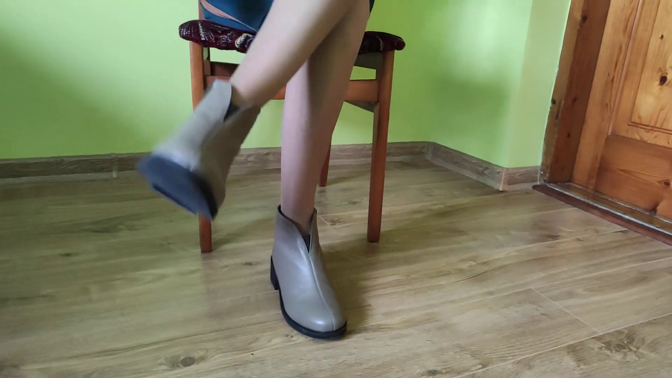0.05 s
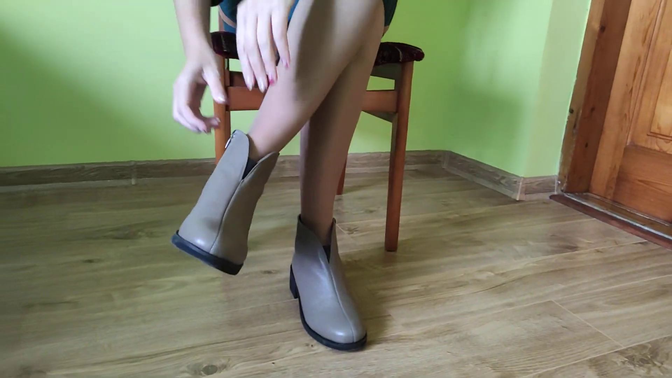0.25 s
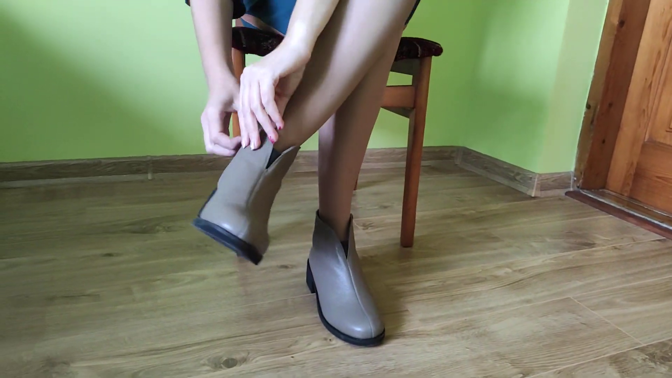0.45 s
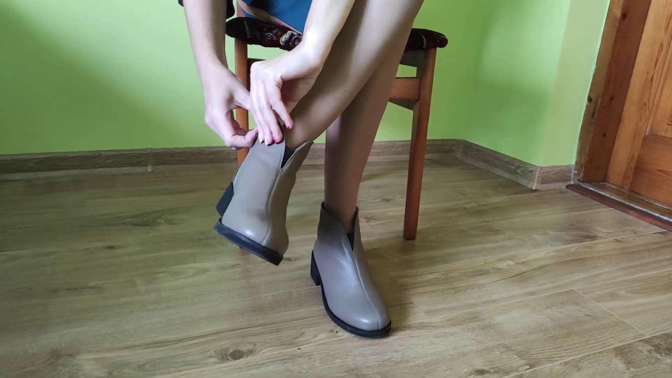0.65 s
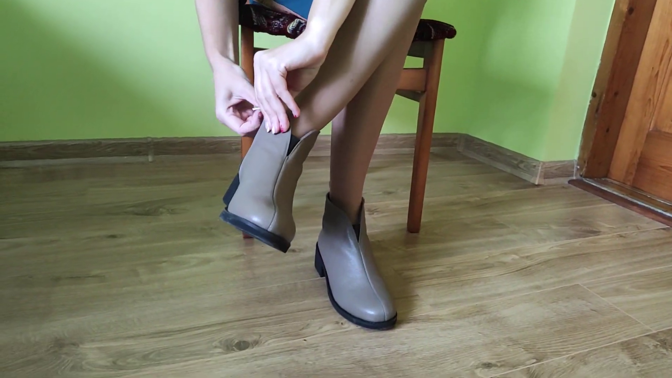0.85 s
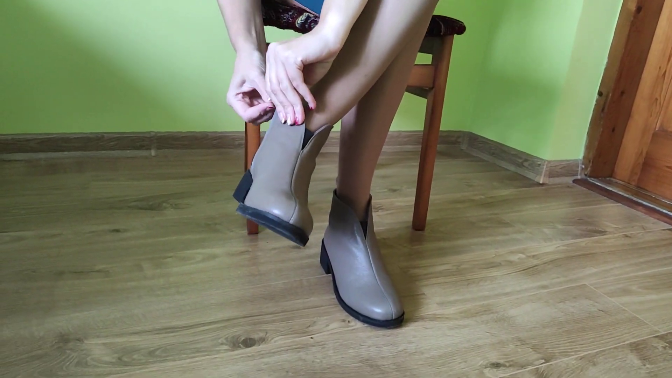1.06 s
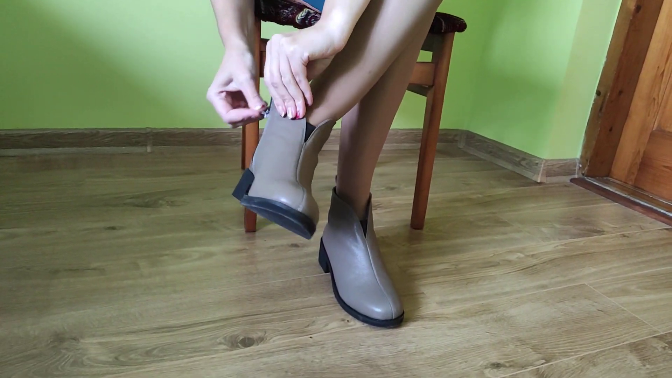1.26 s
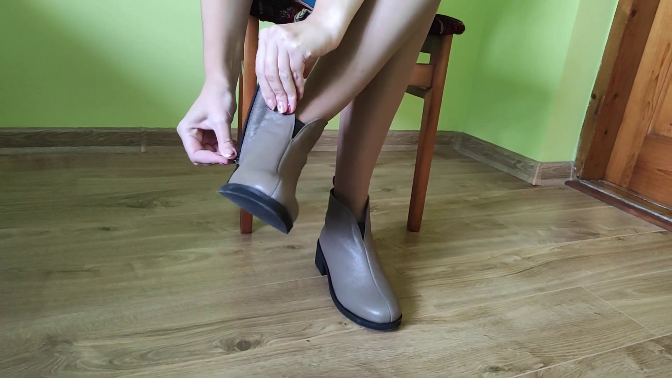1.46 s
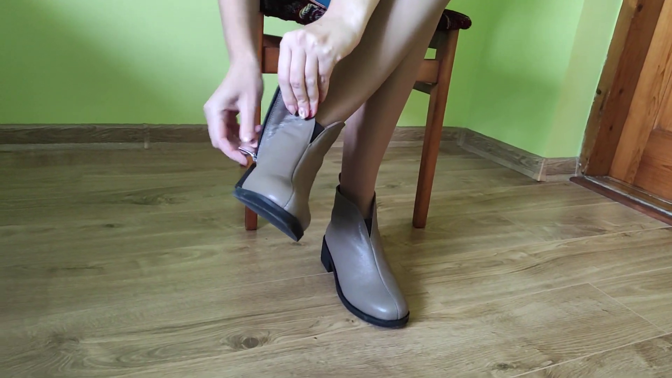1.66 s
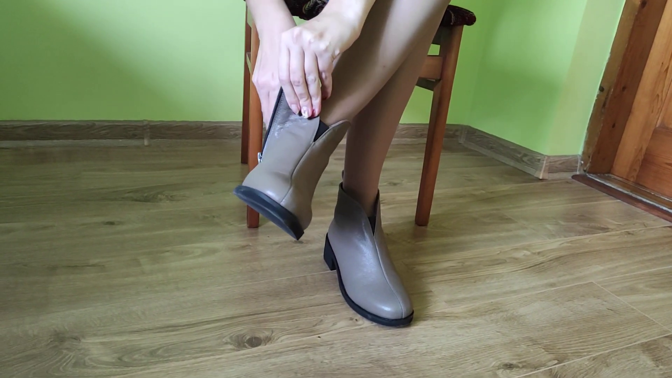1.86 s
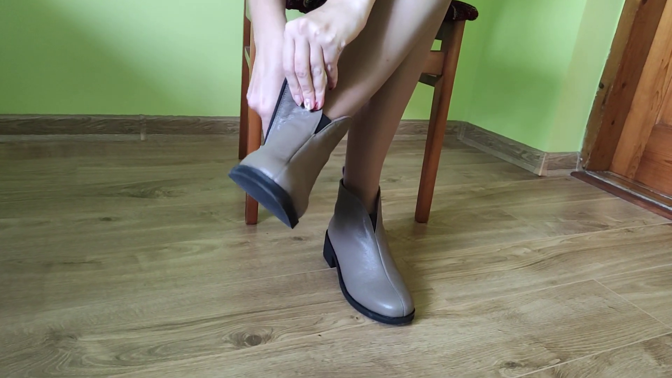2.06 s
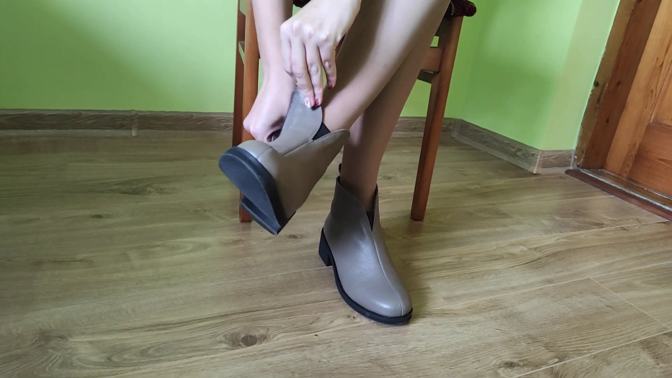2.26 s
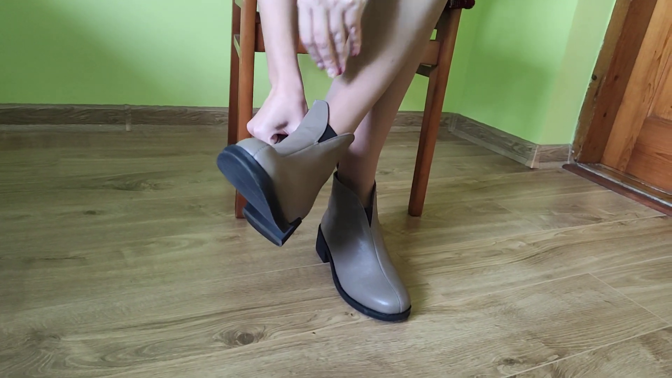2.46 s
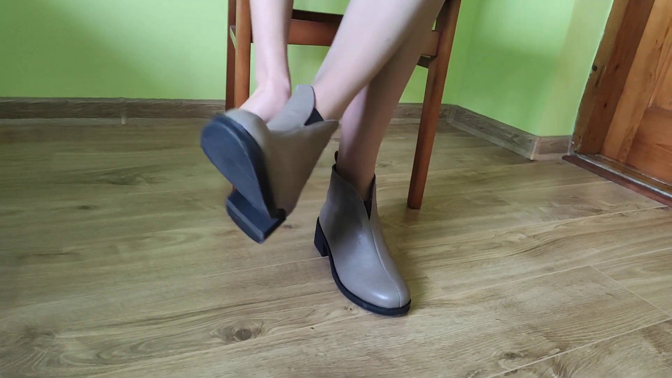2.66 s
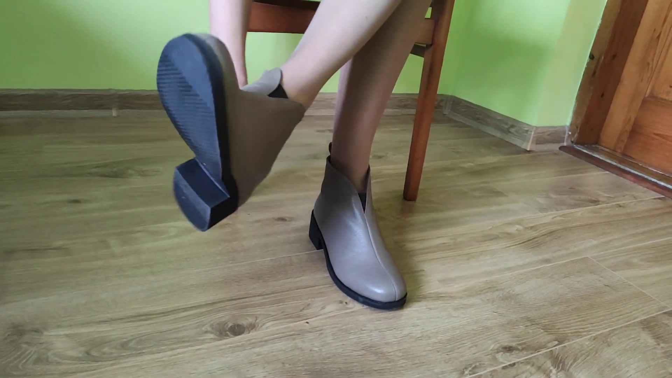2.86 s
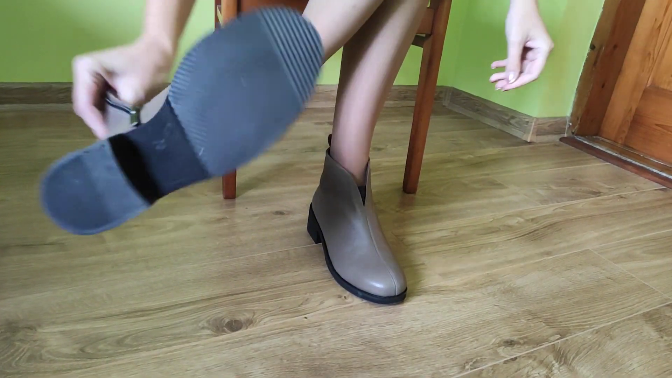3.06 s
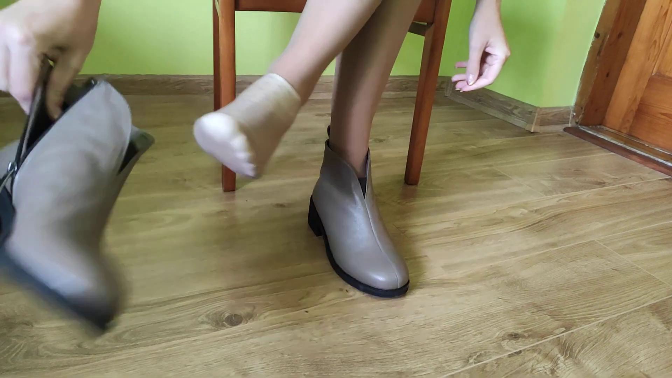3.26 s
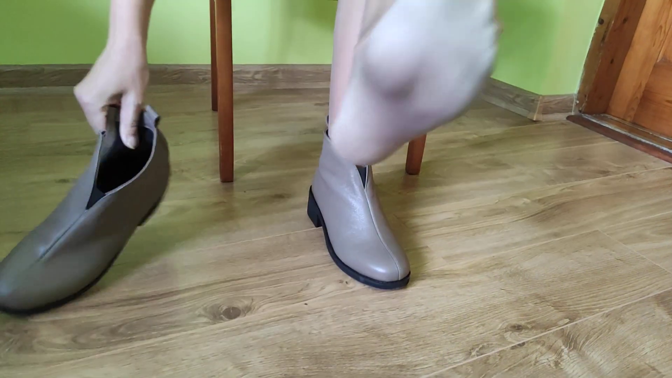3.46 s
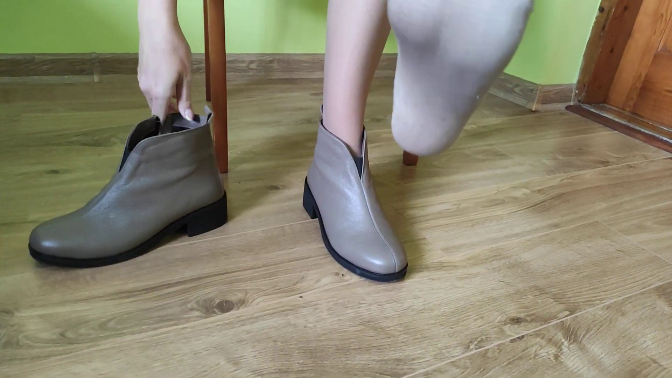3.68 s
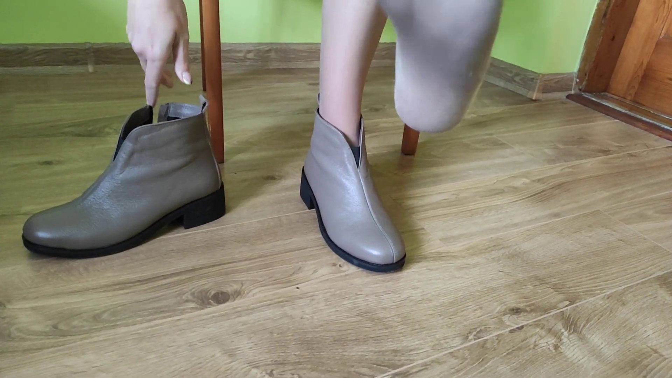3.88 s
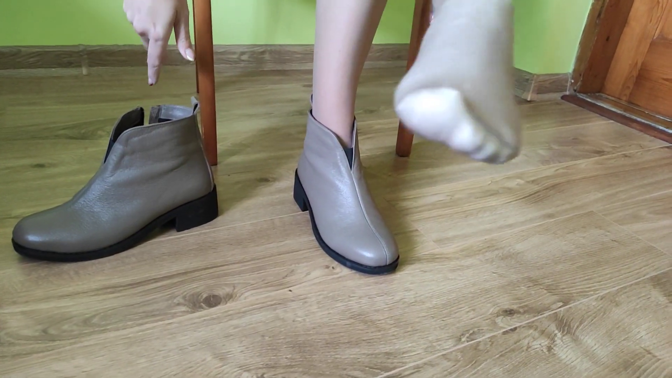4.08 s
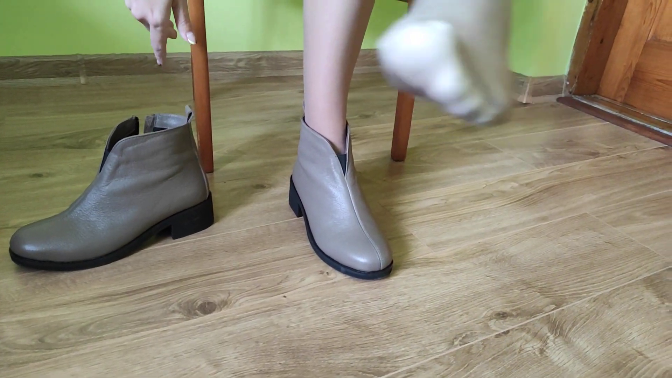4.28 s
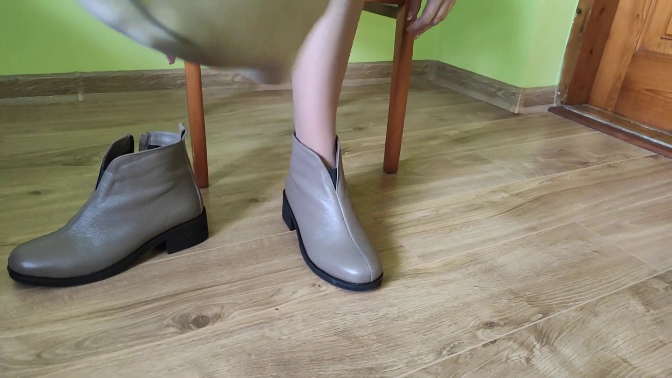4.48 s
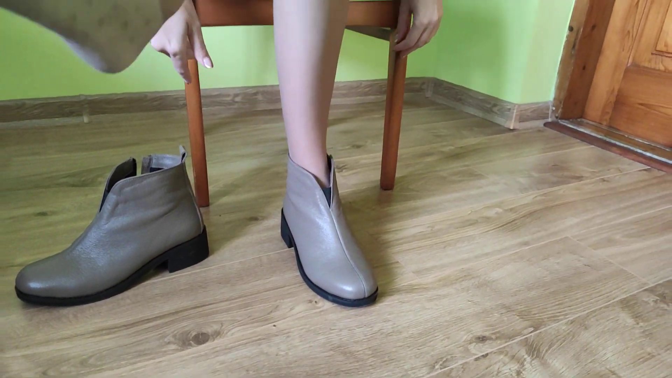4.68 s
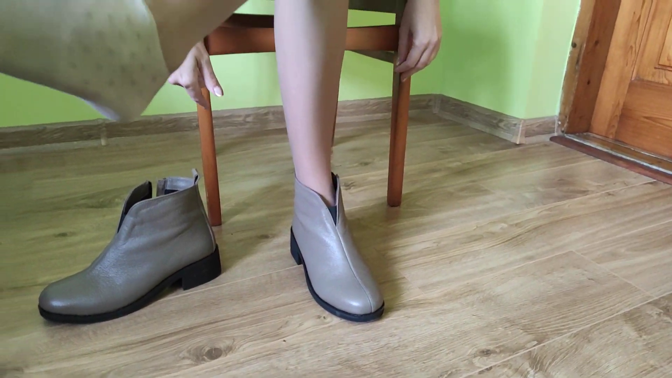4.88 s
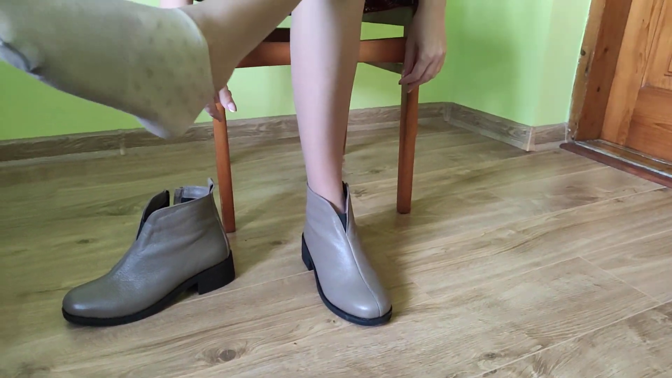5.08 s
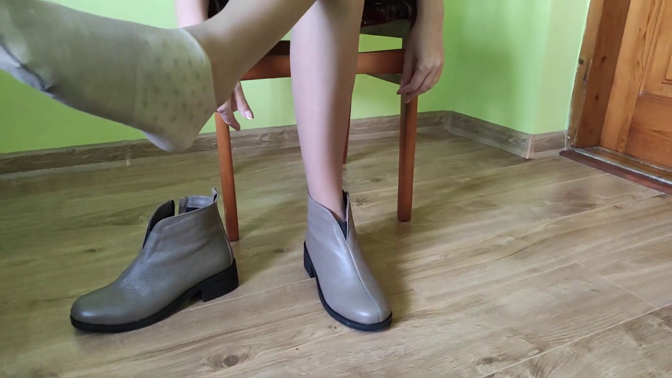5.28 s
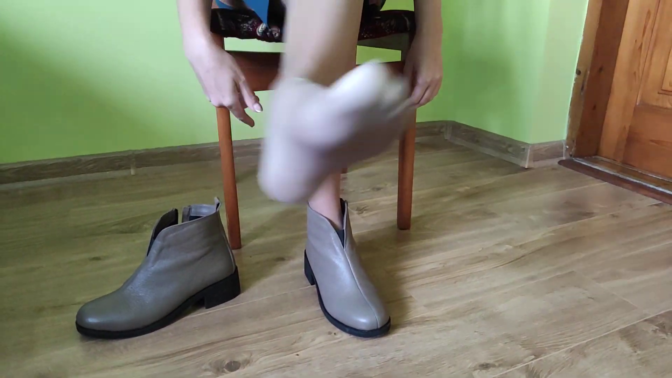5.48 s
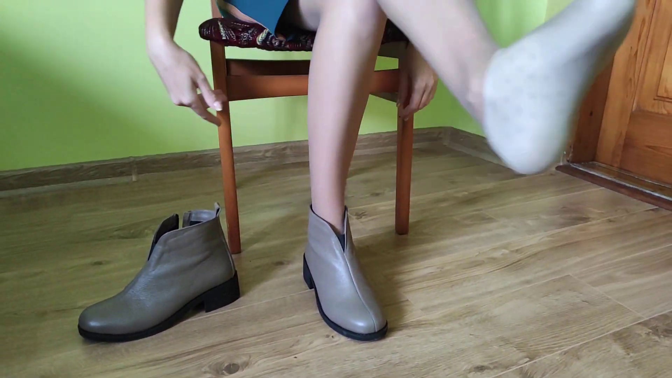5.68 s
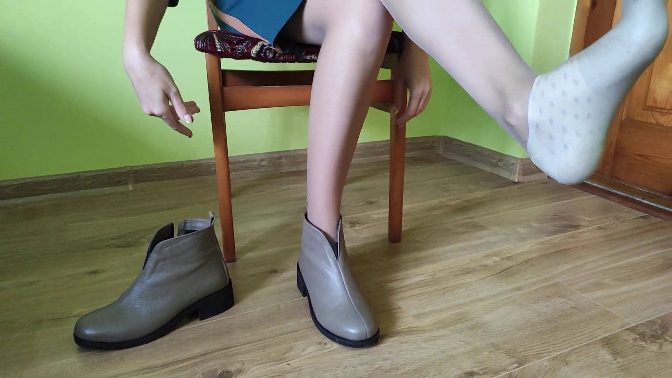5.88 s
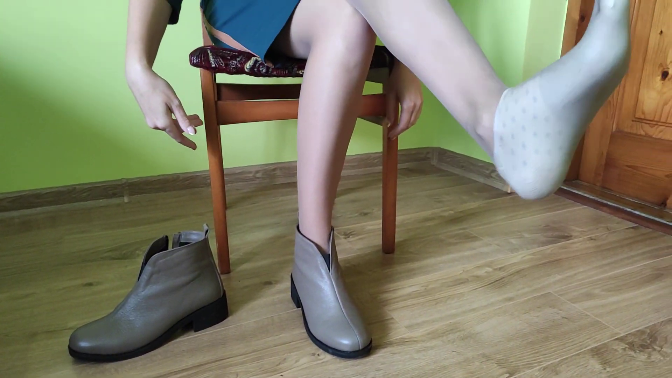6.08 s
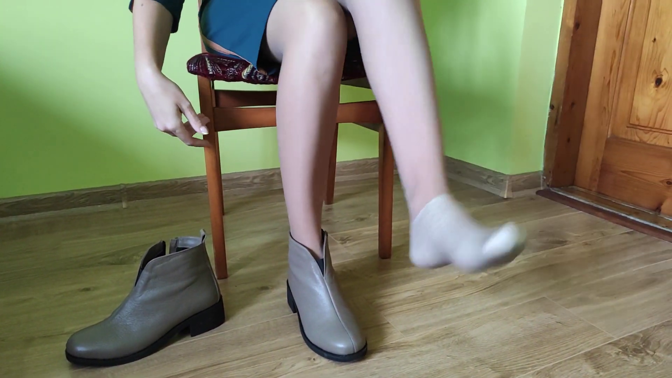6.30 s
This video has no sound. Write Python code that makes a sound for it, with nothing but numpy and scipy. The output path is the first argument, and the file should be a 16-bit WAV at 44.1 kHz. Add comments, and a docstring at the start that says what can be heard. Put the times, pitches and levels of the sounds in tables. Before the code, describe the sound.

Light leather scuffs and fumbling clicks come first, then a bright snap and quick zip rasp. A breathy fabric swish grows and peaks as the boot comes off, and a loud woody knock with a hollow boot thud follows, repeated at once more softly, with faint settling taps. Faint brushing and a few dry ticks end it. Close stereo microphones, small hard room with a short echo, low and hissy air, impacts leaning left.

```python
"""Cloth and leather rub and tick; a leather ankle boot is unzipped, pulled off a socked foot and set on laminate.
Rubbing is slip noise through material colours, the zip a run of scrapes, ticks are decaying noise bursts.
Sole knocks ring board modes, with an edge crack and a hollow-boot thump.
Sparse echoes make the bare room, over quiet air; two small microphone ports favour 7 kHz."""
import sys
import numpy as np
from scipy import signal
from scipy.fft import rfft, irfft
from scipy.io import wavfile
from scipy.ndimage import uniform_filter1d

SR = 44100
rng = np.random.default_rng(int(sys.argv[2]) if len(sys.argv) > 2 else 0)


def to_wav(s):
    """Save 16-bit WAV."""
    ch = np.atleast_2d(s).T  # columns
    pcm = np.round(np.clip(ch, -1, 1) * 32767)  # PCM
    wavfile.write(sys.argv[1], SR, pcm.astype(np.int16))


def boost(x):
    """Linear amplitude factor 10**(x/20) for a level x in decibels (scalar or array-like)."""
    u = np.asarray(x, float) / 20
    return 10 ** u


N = 279594

# Fine hiss through the port resonance. Each row: frequency in Hz, relative level in dB per Hz.
FINE = [(2240, -52.5), (3800, -14.5), (4210, -13), (4940, -4), (5570, -3.5), (6740, 1.5), (7450, 4.5),
        (8970, -2), (9410, -9.5), (9980, -21.5), (11500, -17.5), (14000, -19.5), (15800, -16.5)]
# Low shuffle of cloth and boot shaft. Each row: frequency in Hz, relative level in dB per Hz.
SHUFFLE = [(53, -82.5), (95, -14.5), (150, -0.5), (215, 1), (253, -3), (296, 0.5), (409, -7), (650, -7.5),
           (840, -66.5), (1430, -120)]
# The left port takes more of the low sounds. Entries: left-right level in dB of fine, scuff, low.
LEAN_DB = [-2, 4.5, 7]


def evened(x):
    """Scales to rms 1."""
    return x / np.sqrt(np.mean(x ** 2) + 1e-20)


def read(points, hz):
    """Reads a table on a log-frequency axis."""
    f, value = np.transpose(points)
    return np.interp(np.log(hz + 1), np.log(f + 1), value)


def colour(points):
    """Causal (minimum-phase) impulse response of energy 1 with the given spectrum."""
    level_db = np.maximum(read(points, np.fft.rfftfreq(4096, 1 / SR)), -100)
    log_gain = level_db * np.log(10) / 20
    circle = np.r_[log_gain, log_gain[-2:0:-1]]
    phase = -signal.hilbert(circle).imag
    taps = np.fft.ifft(np.exp(circle + 1j * phase)).real[:2048]
    return taps / np.linalg.norm(taps)


def sides(x, pan_db):
    """Two channels, the left louder by pan_db."""
    return np.array([x * boost(pan_db / 2), x * boost(-pan_db / 2)])


def strokes():
    """Levels in dB of fine hiss, scuff and low shuffle: every stroke swells and fades, and their powers add."""
    # Strokes of cloth and leather sliding. Each row: start in seconds, rise and fall in seconds (20 dB each),
    # fine hiss and leather scuff in dB before the mix.
    stroke_rows = [(0.0, 0.0012, 0.092, -50, -55), (0.12, 0.044, 0.11, -56, -61.5),
                   (0.256, 0.085, 0.32, -56, -60), (0.403, 0.13, 0.069, -55.5, -57),
                   (0.66, 0.1, 0.34, -60, -64.5), (1.312, 0.1, 0.085, -46, -52.5),
                   (1.72, 0.11, 0.18, -60.5, -63), (2.033, 0.068, 0.29, -53, -59.5),
                   (2.145, 0.61, 0.019, -46.5, -54.5), (2.8, 0.21, 0.16, -39.5, -48),
                   (3.199, 0.47, 0.25, -56, -62), (3.983, 0.22, 0.42, -57, -67.5),
                   (4.45, 0.25, 0.31, -63.5, -67.5), (5.45, 0.24, 0.28, -60, -67.5),
                   (6.036, 0.24, 1, -56, -63)]
    rounding = 1.13  # 1: pointed strokes, 2: round ones
    low_under_scuff_db, low_steady_db = -8.5, -72.5
    t = np.arange(0, N + 64, 64) / SR
    start, rise, fall, fine_db, scuff_db = np.transpose(stroke_rows)[:, :, None]
    peak_s = start + rise
    away = np.maximum((peak_s - t) / rise, (t - peak_s) / fall)
    shape_db = -20 * abs(away) ** rounding
    fine = (boost(fine_db + shape_db) ** 2).sum(0)
    scuff = (boost(scuff_db + shape_db) ** 2).sum(0)
    low = scuff * boost(low_under_scuff_db) ** 2 + boost(low_steady_db) ** 2
    return [np.interp(np.arange(N) / SR, t, 10 * np.log10(p + 1e-14)) for p in (fine, scuff, low)]


def rubbing(slips_per_s=4000, spread_db=3.6, lumpy_db=2.6):
    """Thousands of tiny fibre slips, in clumps, excite the cloth, the leather and the boot shaft."""
    # Leather scuff. Each row: frequency in Hz, relative level in dB per Hz.
    scuff_colour = [(350, -31.5), (600, -8), (735, -6), (987, -9.5), (1280, -7.5), (1390, -13.5),
                    (1500, -9), (4500, -13), (5850, -17.5), (9900, -120)]
    pan_db = -0.5
    lumps = evened(uniform_filter1d(rng.standard_normal(N), 600))
    size = boost(spread_db * np.minimum(rng.exponential(1, N), 3))
    size *= rng.random(N) < slips_per_s / SR
    # the slips reach both ports; the smooth hiss of a wide rubbing surface differs at each
    shared = evened(size * rng.standard_normal(N))
    slips = evened(shared + 1.54 * rng.standard_normal((2, N))) * boost(lumpy_db * lumps)
    out = np.zeros((2, N))
    for db, points, lean_db in zip(strokes(), (FINE, scuff_colour, SHUFFLE), LEAN_DB):
        drive = slips * sides(boost(db), pan_db + lean_db)
        out += signal.oaconvolve(drive, colour(points)[None], axes=1)[:, :N]
    return out


def zip_teeth(spread_db=3.2):
    """Uneven short scrapes of uneven size, one per tooth, thump the boot shaft."""
    # Boot shaft under the zip. Each row: frequency in Hz, relative level in dB per Hz.
    shaft = [(180, -49), (300, -12), (600, -1.5), (1000, 0), (1600, -4), (2470, -9.5), (3510, -24),
             (5000, -41), (6500, -46), (11000, -120)]
    # The slider runs over its teeth. Each row: time in seconds, level in dB before the mix.
    run = [(1.315, -59), (1.40, -56), (1.43, -48.5), (1.455, -52), (1.474, -47.5), (1.486, -56)]
    teeth_per_s, uneven, tooth_t60_s = 260, 0.45, 0.007
    gap, size = rng.standard_normal((100, 2)).T
    at, db = np.transpose(run)
    s = at[0] + np.cumsum(np.exp(uneven * gap)) / teeth_per_s
    level = boost(np.interp(s, at, db) + spread_db * size) * np.sqrt(SR / teeth_per_s)
    clicks = np.zeros(N)
    clicks[(s * SR).astype(int)] = (s < at[-1]) * level
    scrape = boost(-60 * np.arange(400) / SR / tooth_t60_s)
    scrape /= np.linalg.norm(scrape)
    scrapes = signal.oaconvolve(clicks, scrape)[:N] * rng.standard_normal(N)
    return sides(signal.oaconvolve(scrapes, colour(shaft))[:N], LEAN_DB[1])


def ticks():
    """Each tick is a sudden short burst in the same materials; returns direct sound and what feeds the room."""
    # Ticks of zip, seams and chair. Each row: time in seconds, bright level in dB, body level in dB,
    # dullness (0 hard edge, 1 leather, 2 low), room share in dB before the mix (low when close to the ports),
    # ring frequency in Hz, ring level in dB, rattle t60 in seconds.
    tick_rows = [(0.142, -52, -54, 0.14, -5, 1680, -88, 0.028),
                 (0.6054, -43.5, -43, 0.52, -14.5, 198, -45.5, 0.024),
                 (0.6926, -80, -44, 1.5, -19, 700, -45, 0.0087),
                 (0.762, -49, -60, 0.11, -14, 2200, -76, 0.04),
                 (0.8447, -47, -72, 0.5, -12, 166, -50, 0.025), (0.946, -60, -81, 0.39, 2, 2500, -86, 0.05),
                 (0.964, -58, -53, 0.44, -13, 2550, -86, 0.029),
                 (1.15, -64, -62, 0.86, -7, 870, -61, 0.027),
                 (1.3005, -24, -29, 0.81, -6.5, 910, -38.5, 0.026),
                 (1.6262, -56.5, -60, 1.6, -10.5, 800, -57, 0.03),
                 (1.679, -55, -58.5, 0.39, -7, 913, -70, 0.066),
                 (1.73, -54, -51, 0.76, -5, 1130, -47, 0.03),
                 (1.859, -49, -38, 0.69, -10.5, 1340, -42, 0.032),
                 (2.839, -48, -46.5, 0.15, -10, 1810, -45, 0.043),
                 (2.8476, -33, -38.5, 0.55, -16.5, 1710, -62, 0.012),
                 (3.2834, -53.5, -52.5, 1.8, -9.5, 232, -55.5, 0.04),
                 (3.441, -47.5, -45.5, 0.15, -9, 1830, -63, 0.061),
                 (3.7296, -45, -48.5, 0.99, -21, 447, -51, 0.023),
                 (4.475, -45.5, -49.5, 0.078, -4.5, 3670, -67, 0.05),
                 (4.480, -60, -58, 0.072, -10.5, 1740, -46, 0.061),
                 (5.071, -67, -76, 0.12, -24, 1770, -53.5, 0.025),
                 (5.484, -61.5, -72, 0.09, -3, 1720, -80, 0.077),
                 (5.614, -47, -49.5, 0.035, -10, 1840, -53, 0.058)]
    # Hard edge, then leather. Each row: frequency in Hz, relative level in dB per Hz.
    snap = [(900, -22), (1300, -2.5), (1900, -0.5), (2600, 2.5), (3200, -3), (3950, -3), (5000, -8.5),
            (6000, -64)]
    tap = [(350, -49), (600, 3.5), (780, 7), (1000, 7), (1500, 0.5), (2100, -2), (2800, -4.5),
           (3400, -39.5)]
    harder_db, softer_db = 12.5, 6.5  # a body's loss per step harder or softer than the tick's dullness
    ring_cycles = 13  # the ring falls 60 dB in this many
    ring_room_db = -5  # the walls return less of the ring than of the rattle
    rise_share, sharp_s = 0.032, 0.13  # rise as share of t60; the release adds sharp_s / t60
    out, t = np.zeros((2, 2, N + SR)), np.arange(SR // 8) / SR
    bodies = [colour(points) for points in (FINE, snap, tap, SHUFFLE)]
    fine_db, scuff_db, low_db = LEAN_DB
    leans_db = fine_db, scuff_db, scuff_db, low_db
    noises = rng.standard_normal((len(tick_rows), len(t)))
    for row, noise in zip(tick_rows, noises):
        s, bright_db, body_db, dull, room_db, ring_hz, ring_db, t60 = row
        step = np.arange(len(bodies) - 1) - dull
        levels_db = [bright_db, *(body_db - np.maximum(softer_db * step, -harder_db * step))]
        burst = noise * boost(-60 * t / t60) * np.minimum(t / (rise_share * t60), 1)
        burst[20] += sharp_s / t60  # one clean release early in the rattle
        body = sum(sides(boost(db) * taps, lean_db)
                   for db, taps, lean_db in zip(levels_db, bodies, leans_db))
        ring_t = t[:2048]
        ring = boost(-60 * ring_t * ring_hz / ring_cycles) * np.sin(2 * np.pi * ring_hz * ring_t)
        ring = sides(boost(ring_db) * ring / np.linalg.norm(ring), scuff_db)
        strength = np.linalg.norm(burst)
        sound = signal.fftconvolve(burst[None], body, axes=1)
        sound[:, :2048] += strength * ring  # rings once, not for every grain of the rattle
        body += boost(ring_room_db) * ring
        at = round(s * SR)
        out[0, :, at:][:, :sound.shape[1]] += sound
        # the walls average over all directions: whole burst energy in the plain colour of the bodies
        out[1, :, at:][:, :body.shape[1]] += boost(room_db) * strength * body
    return out[..., :N]


def board_ring(boards, pitch, t, rise_cycles=0.76):
    """Bending spreads out over the boards, low modes build last; each spot wakes them differently."""
    spot_db, spot_detune = 2, 0.02
    strength, detune = rng.standard_normal((len(boards), 2)).T
    ring = np.zeros(len(t))
    for k, (hz, db, t60) in enumerate(boards):
        level = (-1) ** k * boost(db + spot_db * strength[k] - 60 * t / t60)
        mode = np.sin(2 * np.pi * hz * (pitch + spot_detune * detune[k]) * t)
        ring += level * mode * (1 - np.exp(-t * hz / rise_cycles))
    return ring


def knocks():
    """A smooth push rings the boards, longer is duller; edge cracks, boot thumps; returns direct, room feed."""
    # Sole on the boards. Each row: time in seconds, board peak in dB before panning, contact in ms (3 samples
    # are added), pitch factor of the boards, sole-edge crack in dB, its lead in seconds,
    # hollow-boot thump in dB, its lag in seconds.
    knock_rows = [(3.549, -20, 0.2, 1.02, -35.5, 0.00151, -18.5, 0.0003),
                  (3.666, -24, 1.82, 1.08, -39, 0.00033, -21, 0.0039),
                  (3.697, -30, 2.0, 1.07, -60, 0.00058, -52, 0.001),
                  (3.838, -45, 1.8, 1.15, -64, 0.00046, -56, 0.00083),
                  (3.855, -44, 2, 1.05, -56, 0.00062, -35.5, 0.0029),
                  (3.905, -47.5, 2.0, 0.833, -63, 0.00046, -54, 0.0011)]
    # Modes of boards and hollow boot. Each row: frequency in Hz at pitch factor 1, relative level in dB,
    # t60 in seconds.
    boards = [(71.6, -5, 0.17), (103, -6, 0.064), (135.5, -6.5, 0.12), (145, -13.5, 0.12),
              (180.4, -6, 0.11), (263.5, -22.5, 0.22), (301.4, -11.5, 0.099), (357, -19, 0.18),
              (375.6, -16.5, 0.11), (444, 9, 0.027), (452.7, -8.5, 0.088), (506, -21, 0.11),
              (636, -6.5, 0.045), (700, -3.5, 0.038), (748, -10, 0.051), (800, -13, 0.15), (880, -5, 0.027),
              (1055, -13, 0.022)]
    # Sole-edge crack. Each row: frequency in Hz, relative level in dB per Hz.
    crack_colour = [(800, -9), (1200, 0.5), (1900, -1.5), (2900, -5), (3600, -21), (4500, -14), (9000, -25),
                    (11000, -57)]
    thump_hz, thump_sag_hz_per_s, thump_peak_s = 232, 3300, 0.0061  # thump_hz at pitch factor 1
    thump_room_db = -7.5  # the walls return less of the thump than of the boards
    out, thumps, t = np.zeros(N + SR), np.zeros(N + SR), np.arange(SR // 2) / SR
    bass_cut = signal.butter(3, 115, "high", fs=SR, output="sos")  # the microphone takes little deep bass
    noises = rng.standard_normal((len(knock_rows), len(t)))
    for row, noise in zip(knock_rows, noises):
        s, peak_db, contact_ms, pitch, crack_db, lead_s, thump_db, lag_s = row
        push = np.sin(np.linspace(0, np.pi, int(contact_ms * SR / 1000) + 3)) ** 2
        sound = np.convolve(board_ring(boards, pitch, t), push)[:len(t)]
        sound = signal.sosfilt(bass_cut, sound)
        crack = noise * boost(crack_db - 60 * t / 0.032)
        crack = signal.fftconvolve(crack, colour(crack_colour))[:len(t)]
        out[round((s - lead_s) * SR):][:len(t)] += crack
        out[round(s * SR):][:len(t)] -= boost(peak_db) * sound / abs(sound).max()
        swell = t / thump_peak_s * np.exp(0.5 - 0.5 * (t / thump_peak_s) ** 2)
        tone = np.sin(2 * np.pi * t * (thump_hz * pitch - thump_sag_hz_per_s * t / 2))
        thumps[round((s + lag_s) * SR):][:len(t)] -= boost(thump_db) * swell * tone
    thumps = signal.sosfilt(bass_cut, thumps)
    direct, far = out + thumps, out + boost(thump_room_db) * thumps
    return sides(direct[:N], 7.6), sides(far[:N], 5.4)


def room(x):
    """Sparse echoes of random sign, other ones for each port, each band dying at its own speed."""
    # Decay of the bare room. Each row: frequency in Hz, t60 in seconds.
    walls = [(120, 0.22), (330, 0.51), (900, 0.5), (2300, 0.5), (6000, 0.44), (12000, 0.3)]
    taps = np.zeros((2, SR))
    at = np.arange(160, SR - 20, 20) + rng.integers(0, 20, (2, (SR - 161) // 20))
    np.put_along_axis(taps, at, rng.choice([-1., 1.], at.shape), 1)
    hz, t, z = signal.stft(taps, SR, nperseg=256)
    # bass reaches both ports nearly alike
    z[0] = np.where(hz[:, None] < 420, 0.97 * z[1] + 0.43 * z[0], z[0])
    decay = boost(-60 * t / read(walls, hz)[:, None])
    tail = signal.istft(z * decay, SR, nperseg=256)[1]
    return signal.fftconvolve(x, tail / np.linalg.norm(tail[0]), axes=1)[:, :N]


def air():
    """The quiet room and the microphone's own hiss, gently patchy, over a slow deep drift."""
    # Spectrum of the air. Each row: frequency in Hz, relative level in dB.
    air_colour = [(3, 11), (11, 8.5), (22, -17), (45, -2), (100, -11), (246, -14.5), (453, -14), (642, -10),
                  (1450, -22), (1680, -22.5), (4930, -30.5), (7200, -28), (8570, -33), (9920, -41),
                  (12200, -36), (13300, -55), (15800, -58)]
    # Likeness of the two ports. Each row: frequency in Hz, correlation from 0 to 1.
    likeness = [(60, 0.032), (240, 1), (950, 0.28), (3770, 0.016), (15000, 0.019)]
    # Balance of the ports. Each row: frequency in Hz, left-right level in dB.
    balance = [(60, 7.5), (240, 5), (950, 4.5), (3770, 1), (15000, -5)]
    level_db, patchy_db = -61.5, 1.5
    frames, hz = N // 1024 + 5, np.fft.rfftfreq(4096, 1 / SR)
    a, b, c, d, patches = rng.standard_normal((frames, 2049, 5)).T
    patches = evened(uniform_filter1d(uniform_filter1d(patches, 48, 0), 4, 1))
    same = np.clip(read(likeness, hz), -1, 1)[:, None]
    left = a + 1j * b
    right = same * left + np.sqrt(1 - same ** 2) * (c + 1j * d)
    gains = sides(boost(read(air_colour, hz)), read(balance, hz))
    z = np.array([left, right]) * gains[:, :, None] * boost(patchy_db * patches)
    noise = signal.istft(z, nperseg=4096, noverlap=3072)[1][:, :N]
    return boost(level_db) * evened(noise)


def scene():
    """Direct sound, the hits later at the left port, plus the room and the air."""
    left_lag_samples = 13
    rub, teeth = rubbing(), zip_teeth()
    tick, tick_far = ticks()
    knock, knock_far = knocks()
    hits = tick + knock + boost(3.0) * teeth
    hits[0] = np.r_[np.zeros(left_lag_samples), hits[0, :-left_lag_samples]]
    to_room = rub + boost(11.0) * tick_far + boost(-1.0) * knock_far + teeth
    return boost(-1.5) * rub + hits + room(to_room) + air()


def top_cut(x):
    """Nothing passes above the cut-off."""
    return signal.sosfilt(signal.butter(12, 16300, fs=SR, output="sos"), x)


def record(dry):
    """The colour of each port, then the band limit."""
    # The two ports differ in colour. Each row: frequency in Hz, left-right level in dB.
    port_balance = [(200, -1.5), (400, -1.5), (2500, -1), (5000, -2.5), (7500, -2.5), (8500, 6.5),
                    (13000, 2)]
    hz = np.fft.rfftfreq(N, 1 / SR)
    ports = irfft(rfft(dry) * sides(np.ones(len(hz)), read(port_balance, hz)), N)
    low_pass = signal.firwin(511, 15800, window=("kaiser", 9), fs=SR)
    limited = signal.oaconvolve(ports, low_pass[None], "same")
    return top_cut(limited)


dry = scene()
out = record(dry)
to_wav(out)
```